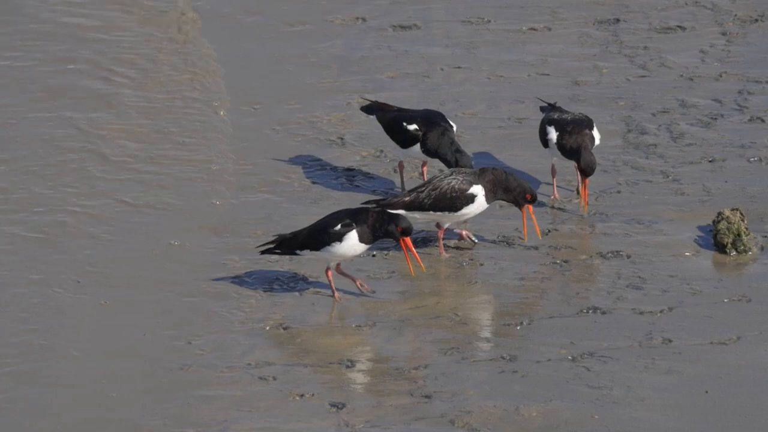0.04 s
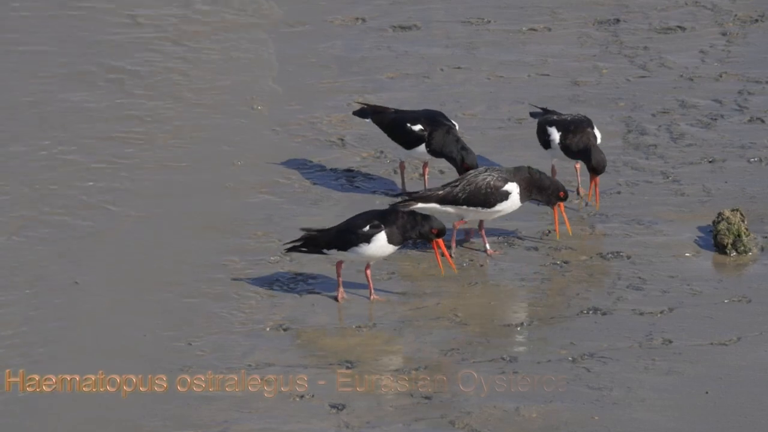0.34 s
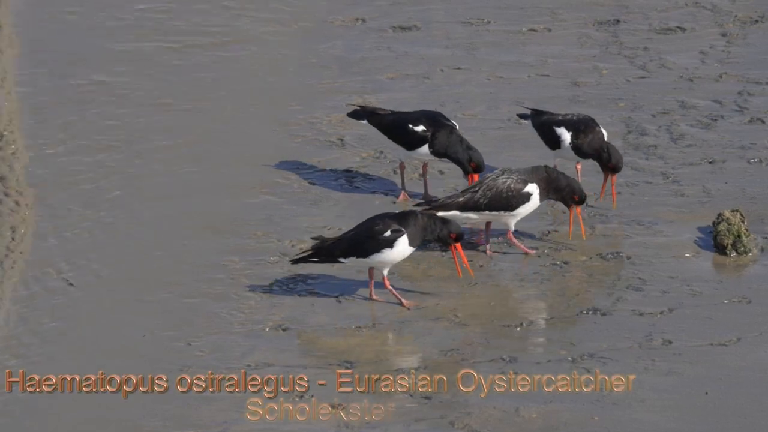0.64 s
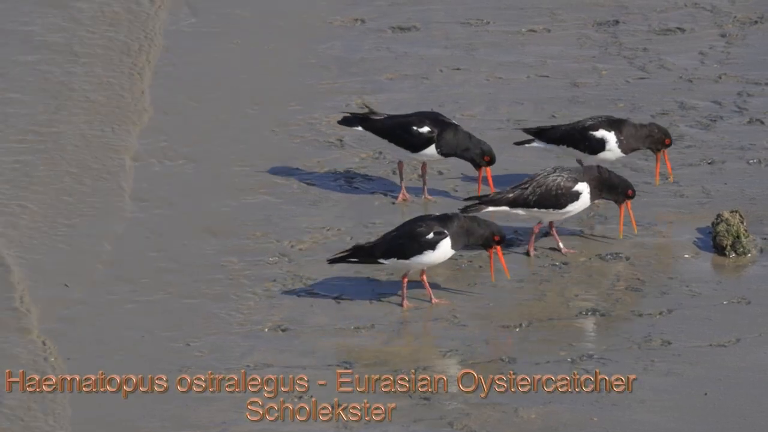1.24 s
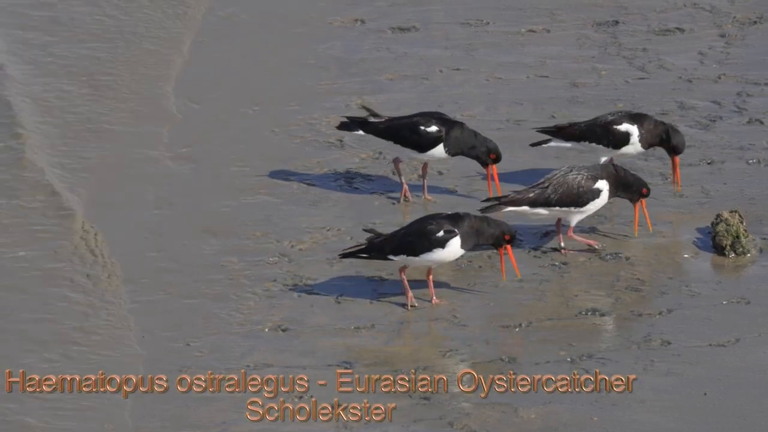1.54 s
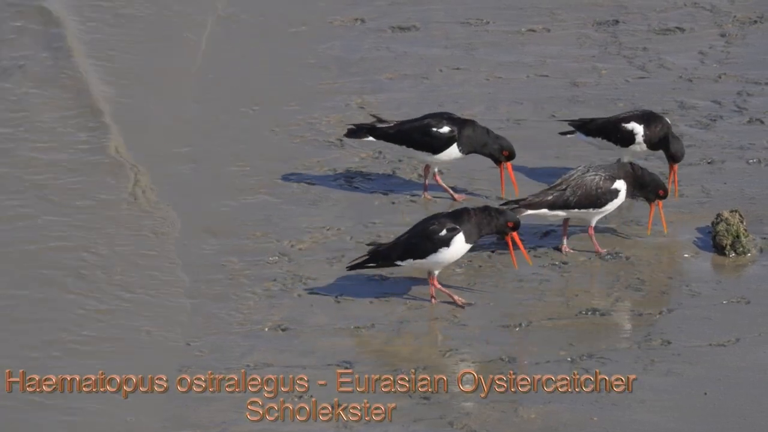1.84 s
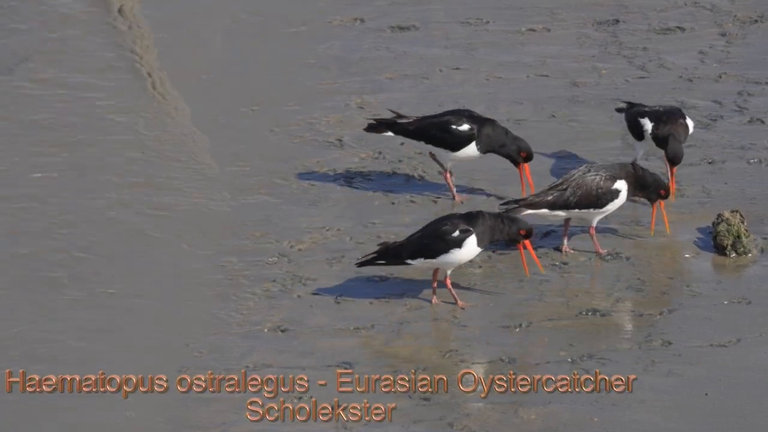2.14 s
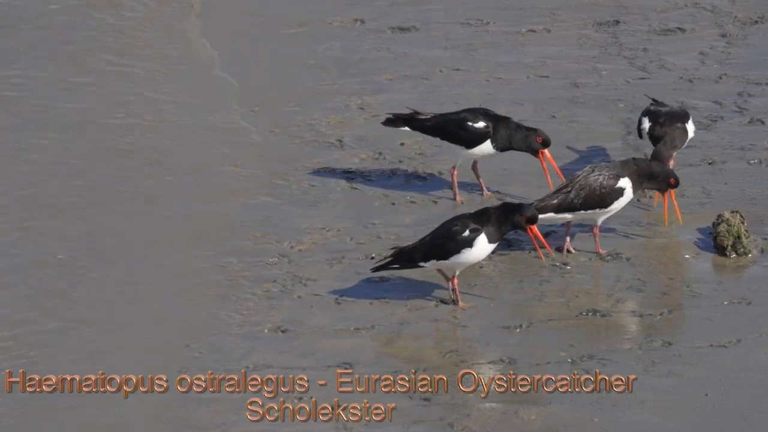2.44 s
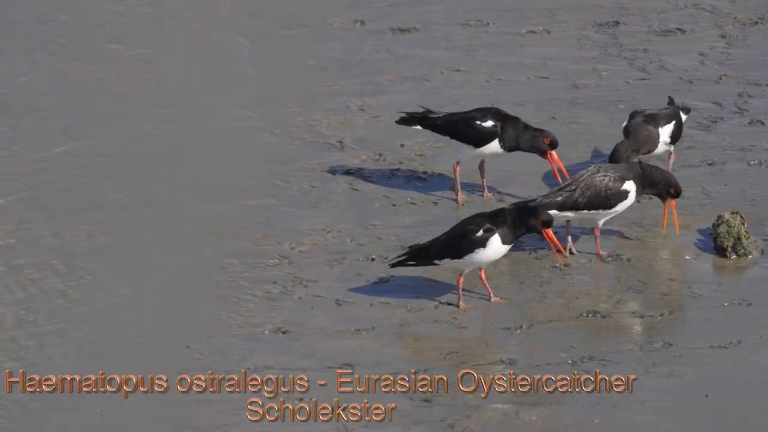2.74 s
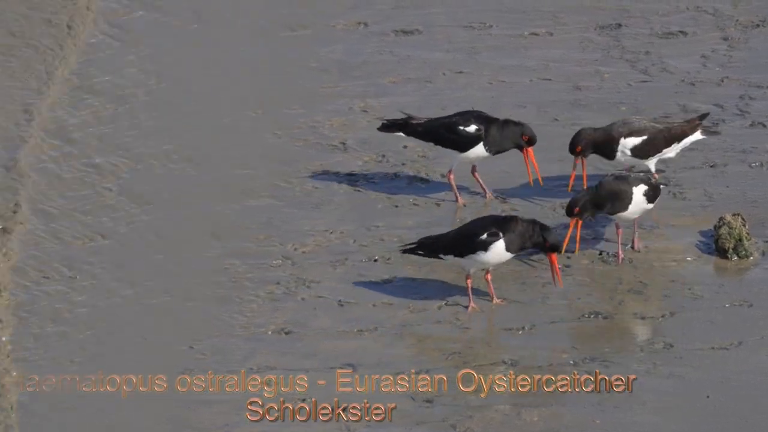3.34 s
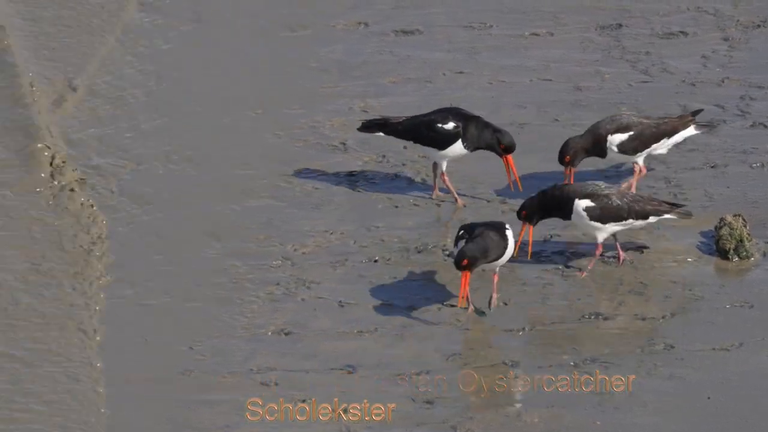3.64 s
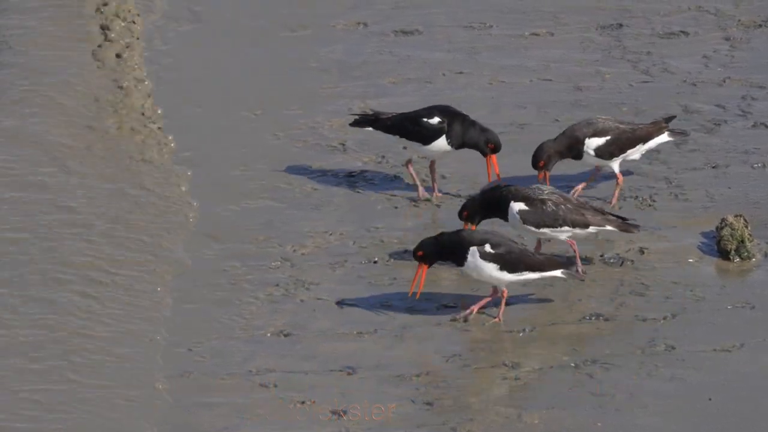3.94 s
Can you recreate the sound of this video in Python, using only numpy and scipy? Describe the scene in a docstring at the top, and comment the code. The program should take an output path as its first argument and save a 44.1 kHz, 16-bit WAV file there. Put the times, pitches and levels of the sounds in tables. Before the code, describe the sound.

Shrill, overlapping piping from several shorebirds, with soft water noise and a brief wooden knock.

```python
"""A mudflat, where four oystercatchers pipe together over a wash of shallow water and a little mic wind.
Shrill kips slide up and break into a high register; lower whistles, arched pips and late, thin squeaks
fall between them, each a few harmonics on a trembling pitch, roughened by air and coloured by the bill.
Hollow wood knocks twice nearby, the banks echo birds and knocks, and one short plip comes near the end."""
import sys
import numpy as np
from scipy import signal
from scipy.fft import rfft, irfft, next_fast_len
from scipy.io import wavfile
from scipy.ndimage import uniform_filter1d, map_coordinates

SR = 44100
rng = np.random.default_rng(int(sys.argv[2]) if len(sys.argv) > 2 else 0)


def unload_audio(sound):
    """Save the sound as a 16-bit wav file, at the path given as the first command line argument."""
    columns = np.transpose(np.atleast_2d(sound))
    # keep every value between -1 and 1, then stretch to whole-number steps
    steps = np.round(np.clip(columns, -1, 1) * 32767)
    wavfile.write(sys.argv[1], SR, steps.astype(np.int16))


N = 176400

# tone of the shallow water (frequency [Hz], level per Hz [dB])
WATER_EQ = [(20, -63), (100, -14.5), (200, -2.5), (800, -9.5), (2500, -6.5), (4000, -12), (14000, -30)]
# fader moves of the wind (time [s], level [dB])
WIND_GUSTS = [(.79, -56), (.86, -48.5), (1.18, -47.5), (1.37, -37), (1.5, -54.5)]
# rumble of wind on the mic (frequency [Hz], level per Hz [dB])
WIND_EQ = [(20, -46), (70, -2), (160, 1), (300, -11.5), (2000, -26)]
# stereo image of the noise layers (frequency [Hz], left-right correlation [ratio])
NOISE_IMAGE = [(50, 0.99), (300, 1), (1000, 0.34), (3000, 0.064), (10000, 0.94)]
# low whistles with a strong octave (centre time [s], top pitch [Hz], fundamental [dB], octave [dB])
LOW_WHISTLES = [(0.346, 2502, -30, -33), (0.595, 2555, -30.5, -36), (0.887, 2576, -31.5, -34.5),
                (0.989, 2570, -30, -35.5), (1.144, 2560, -34.5, -33), (1.25, 2616, -33, -38.5),
                (1.384, 2627, -35, -32.5), (1.643, 2672, -29, -33), (1.908, 2639, -30.5, -33),
                (2.179, 2600, -29, -31.5), (2.459, 2555, -28.5, -32), (2.748, 2475, -30.5, -40)]
# the lead bird's kips
# (centre time [s], length [s], top pitch [Hz], fundamental [dB], octave [dB], left over right [dB])
LEAD_KIPS = [(0.387, 0.047, 3484, -26, -25.5, -9.5), (0.657, 0.042, 3456, -26.5, -27, 2),
             (0.933, 0.047, 3505, -23.5, -26, -4.5), (1.209, 0.043, 3464, -24.5, -28.5, 4),
             (1.473, 0.043, 3423, -24.5, -29.5, 6), (1.746, 0.043, 3432, -33, -31.5, 3),
             (2.019, 0.036, 3430, -29, -32, 11), (2.288, 0.036, 3454, -24, -27.5, -1),
             (2.569, 0.034, 3430, -19.5, -29, -5), (2.845, 0.038, 3405, -27, -33, -6),
             (3.094, 0.029, 3440, -22.5, -34, 3.5), (3.345, 0.033, 3467, -22, -37.5, 3.5),
             (3.603, 0.038, 3428, -26, -35.5, -4), (3.862, 0.036, 3430, -27, -34, -3)]
# the other birds' shorter kips (centre time [s], top pitch [Hz], fundamental [dB], octave [dB])
ANSWER_KIPS = [(0.462, 3125, -19, -30), (0.554, 3300, -27, -29), (0.657, 3090, -26.5, -39),
               (0.723, 3132, -24, -34.5), (0.831, 3247, -29, -32), (1.096, 3150, -31, -30),
               (1.373, 3225, -21, -34.5), (1.641, 3240, -26, -34), (1.861, 3070, -28.5, -39.5),
               (2.256, 3080, -34, -31.5), (2.454, 3156, -48, -31.5), (2.65, 3120, -28.5, -35.5)]
# steeply arched pips (centre time [s], top pitch [Hz], fundamental [dB])
ARCHED_PIPS = [(0.401, 2850, -27), (0.499, 3002, -25.5), (0.784, 2900, -26.5), (0.845, 2800, -28),
               (0.992, 3147, -26), (1.053, 2837, -28), (1.108, 3180, -29.5), (1.156, 2720, -30.5),
               (1.241, 3000, -26.5), (1.483, 3165, -27.5), (1.591, 2948, -31), (1.765, 3050, -27),
               (1.795, 2800, -29.5), (1.915, 3226, -29), (1.968, 2880, -30), (2.019, 3148, -21),
               (2.184, 3126, -25), (2.293, 3134, -24.5), (2.371, 2963, -27.5), (2.47, 3104, -25.5),
               (2.575, 3104, -23.5), (2.749, 3115, -25.5), (2.854, 3060, -21), (3.142, 2950, -23.5),
               (3.39, 2974, -29), (3.772, 3006, -32)]
# thin squeaks, mostly octave (centre time [s], top pitch [Hz], level [dB])
THIN_SQUEAKS = [(2.945, 2330, -46.5), (3, 2823, -31), (3.045, 2240, -36), (3.191, 2740, -44),
                (3.25, 2775, -28.5), (3.297, 2454, -36.5), (3.396, 2476, -38.5), (3.508, 2770, -32),
                (3.562, 2610, -34.5), (3.727, 2580, -36), (3.768, 2775, -33.5), (3.815, 2350, -43),
                (3.874, 2600, -37), (3.961, 2466, -41)]
# air noise in the calls (frequency [Hz], level [dB])
RASP_EQ = [(1200, -43.5), (2400, 7), (3200, 10.5), (3900, -15.5), (5300, 0), (8000, -12), (14000, -19.5)]
# the notch that throat and bill leave above the fundamental (frequency [Hz], gain [dB])
BILL_EQ = [(3520, -0.5), (3750, -40), (4150, -7), (4750, 0.5)]
# reverb time of the banks (frequency [Hz], t60 [s])
BANK_DECAY = [(200, 0.29), (1500, 0.35), (3000, 0.46), (7000, 0.34), (13000, 0.25)]
# tone of the echo return (frequency [Hz], gain [dB])
BANK_EQ = [(200, 1), (1500, -5), (2500, 0), (3300, -2.5), (7000, -4), (11000, -5.5), (14000, -15)]
# a blow and its rebound (time [s], level [dB])
WOOD_HITS = [(2.6464, -24.5), (2.7028, -31.5)]
# modes of the hollow wood (frequency [Hz], level [dB], t60 [s])
WOOD_MODES = [(245, -5, 0.1), (579, -7.5, 0.24), (728, -3.5, 0.17), (788, -3.5, 0.11)]
# contact noise of a knock (frequency [Hz], level per Hz [dB])
CRACK_EQ = [(70, -40), (230, -1), (900, 2.5), (1900, -5.5), (3000, -40)]

LOW_UPPER_DB, ANSWER_UPPER_DB, PIP_UPPER_DB = [-8.5, -8, -20], [-8.5, -22], [-11.5, -5]  # over the octave
SQUEAK_PARTIALS_DB = [-6.5, 1, -13.5, -10, -22]  # partials 1-5 against the squeak's level
LOW_REGISTER_DB = [-8.5, -6.5, -13, 3]  # partials 1-4 against the high register
EDGE_S, HALF_S = 0.0069, .07  # a note's fade; half the span it is built in
NOTE_T = np.arange(-HALF_S, HALF_S, 1 / SR)  # seconds from a note's centre


def amp(db):
    return 10 ** (np.asarray(db) / 20)


def along(points, hz):
    """Read a breakpoint curve on a log frequency axis."""
    f, v = np.transpose(points)
    return np.interp(np.log(hz + 1), np.log(f + 1), v)


def wobble(rate, size=N):
    """A smooth random modulator, rate knots a second."""
    knots = rng.standard_normal(int(size * rate / SR) + 4)
    return map_coordinates(knots, [np.arange(size) * rate / SR])


def filtered(x, response):
    """Zero-phase EQ; response gives the gain at each frequency."""
    size = next_fast_len(N + SR // 2)
    return irfft(rfft(x, size) * response(np.fft.rfftfreq(size, 1 / SR)), size)[..., :N]


def rush(eq):
    """Coloured stereo noise of rms 1, its width set band by band."""
    def mid_side_gains(hz):
        width = np.arccos(np.clip(along(NOISE_IMAGE, hz), -1, 1)) / 2
        return amp(along(eq, hz)) * [np.cos(width), np.sin(width)]
    mid, side = filtered(rng.standard_normal((2, N)), mid_side_gains)
    noise = np.array([mid + side, mid - side])
    return noise / np.sqrt(np.mean(noise ** 2) + 1e-20)


def panned(x, pan_db):
    """Level panning; positive is left."""
    return amp([[pan_db / 2], [-pan_db / 2]]) * x


def add(out, start_s, x):
    """Mix x into out from start_s on."""
    part = out[:, round(start_s * SR):][:, :x.shape[-1]]
    part += x[..., :part.shape[1]]


def step(t, width):
    """A smooth fade from 0 to 1 around t = 0."""
    return .5 + .5 * np.tanh(t / width)


def water(level_db=-42.5):
    """The bed: shallow water washes steadily, its level wavering a little."""
    return amp(level_db + 1.3 * wobble(8.12)) * rush(WATER_EQ)


def wind(pan_db=6):
    """Gusts bump the microphone with a low rumble."""
    gust_db = np.interp(np.arange(N) / SR, *np.transpose(WIND_GUSTS))
    return panned(amp(gust_db + 0.62 * wobble(29.55)) * rush(WIND_EQ), pan_db)


def voice(pitch, gains, pan_db, undertone=0, flutter_db=3, rough_rad=0.065, swell_db_per_s=120):
    """Harmonics on a trembling pitch; the fundamental swells up to mid-note and leans to one side."""
    size = len(pitch)
    jitter = 0.0031 * wobble(482.6, size)
    wander = 0.0044 * wobble(129.2, size)
    phase = 2 * np.pi * np.cumsum(pitch * (1 + jitter + wander)) / SR
    phase += rough_rad * wobble(1500, size)  # grit that smears the high partials most
    partials = []
    for k, gain in enumerate(gains, 1):
        flutter = amp(flutter_db * wobble(218.7, size))
        partials.append(np.sqrt(2) * gain * flutter * np.sin(k * phase) * (k * pitch < SR / 2))
    swell = amp(swell_db_per_s * np.minimum(NOTE_T, 0))
    return panned(partials[0] * swell, pan_db) + sum(partials[1:]) + undertone * np.sin(phase / 2)


def pip(length, hz, levels_db, droop, attack_s=0.0016, undertone_db=-18):
    """One unbroken arch of pitch with a hard attack; droop sets how far its ends sag."""
    pitch = hz / (1 + droop * np.minimum((2 * NOTE_T / length) ** 2, 2))
    envelope = step(NOTE_T + length / 2, attack_s) * step(length / 2 - NOTE_T, EDGE_S)
    # a soft slur an octave below the rise of the arch
    undertone = amp(levels_db[0] + undertone_db) * envelope * step(length / 4 - NOTE_T, EDGE_S)
    return voice(pitch, [amp(db) * envelope for db in levels_db], rng.normal(0, 5.4), undertone)


def kip(length, hz, levels_db, droop, pan_db, low_trim_db=0, lead_s=0.015, trail_s=0.011):
    """The voice slides up in the low register, breaks into a high arch, and drops back."""
    t = NOTE_T
    outside_s = np.abs(t) - length / 2
    high = step(-outside_s, 0.00069)  # the register flips almost at once
    lean = 1 + 0.31 * np.sign(t)  # the arch falls further than it rises
    arch = 1 - droop * np.minimum((2 * t / length) ** 2, 2) * lean
    slide = .83 * np.exp(-12 * np.maximum(outside_s, 0))  # low register as a share of top pitch
    envelope = step(t + length / 2 + lead_s, EDGE_S) * step(length / 2 + trail_s - t, EDGE_S)
    low_gains = amp(np.add(low_trim_db, LOW_REGISTER_DB))
    gains = [amp(db) * envelope * (high + (1 - high) * low) for db, low in zip(levels_db, low_gains)]
    return voice(hz * (high * arch + (1 - high) * slide), gains, pan_db)


def birds(answer_db=-1, pip_db=-2):
    """The dry piping: every call on its cue."""
    out = np.zeros((2, N))
    for s, length, hz, first, octave, pan in LEAD_KIPS:
        levels = [first, octave, -31.5, -49]
        add(out, s - HALF_S, kip(length, hz, levels, droop=0.051, pan_db=pan, low_trim_db=0.5))
    for s, hz, first, octave in ANSWER_KIPS:
        levels = [first, octave, *np.add(octave, ANSWER_UPPER_DB)]
        call = kip(.024, hz, levels, droop=0.03, pan_db=rng.normal(0, 6.2))
        add(out, s - HALF_S, amp(answer_db) * call)
    for s, hz, first, octave in LOW_WHISTLES:
        levels = [first, octave, *np.add(octave, LOW_UPPER_DB)]
        add(out, s - HALF_S, pip(.048, hz, levels, droop=0.07))
    for s, hz, db in THIN_SQUEAKS:
        add(out, s - HALF_S, pip(.037, hz, np.add(db, SQUEAK_PARTIALS_DB), droop=0.15))
    for s, hz, first in ARCHED_PIPS:
        octave = first - 12
        levels = [first, octave, *np.add(octave, PIP_UPPER_DB)]
        add(out, s - HALF_S, amp(pip_db) * pip(.037, hz, levels, droop=0.27))
    return out


def rasp(calls, level_db=-8.5):
    """Air noise that rides the envelope of the calls."""
    envelope = np.sqrt(np.abs(uniform_filter1d(np.mean(calls ** 2, axis=0), size=500)))
    return amp(level_db) * envelope * rush(RASP_EQ)


def bill(calls):
    """Throat and bill carve a notch above the fundamental."""
    return filtered(calls, lambda hz: amp(along(BILL_EQ, hz)))


def banks(x, predelay_s=0.0017, correlation=0.21, count=8):
    """Scattered echoes off the banks; one pattern crossfades to the next as the birds walk about."""
    out, place = np.zeros((2, N)), np.linspace(0, count - 1, N)
    width = np.arccos(correlation) / 2
    for k in range(count):
        hz, t, noise = signal.stft(rng.standard_normal((2, SR // 2)), SR, nperseg=256)
        decay = amp(-60 * t / along(BANK_DECAY, hz)[:, None]) * step(t - predelay_s, 0.0024)
        decay /= np.sqrt(np.sum(decay ** 2, axis=1, keepdims=True) * t[1] * SR)  # equal energy per band
        _, tails = signal.istft(noise * decay * amp(along(BANK_EQ, hz))[:, None], SR, nperseg=256)
        mid, side = tails * [[np.cos(width)], [np.sin(width)]]
        send = np.sqrt(np.maximum(1 - np.abs(place - k), 0)) * x.mean(axis=0)
        out += signal.fftconvolve(send[None], np.array([mid + side, mid - side]), axes=1)[:, :N]
    return out


def knocks(crack_db=2, crack_t60=0.081, pan_db=-8):
    """A blow on hollow wood and its weak rebound: a crack and a few short modes."""
    out, t = np.zeros((2, N)), np.arange(N) / SR
    ring = sum(amp(db - 60 * t / t60) * np.sin(2 * np.pi * hz * t) for hz, db, t60 in WOOD_MODES)
    for s, db in WOOD_HITS:
        crack = amp(crack_db - 60 * t / crack_t60) * rush(CRACK_EQ)
        add(out, s, panned(amp(db) * (ring + crack), pan_db))
    return out


def plip(at_s=3.8513, level_db=-17, width_s=0.0017, hz=850, fall_per_s=410, pan_db=5):
    """A two-cycle blip that dives in pitch."""
    out = np.zeros((2, N))
    phase = 2 * np.pi * hz * (1 - np.exp(-fall_per_s * NOTE_T)) / fall_per_s
    envelope = amp(level_db) * np.exp(-(NOTE_T / width_s) ** 2)
    add(out, at_s - HALF_S, panned(envelope * np.cos(phase), pan_db))
    return out


def scene():
    """Birds and knocks feed the echoes; plip, water and wind stay dry."""
    calls = birds()
    direct = bill(calls + rasp(calls)) + knocks()
    return direct + banks(direct) + plip() + water() + wind()


def record(dry, start_s=.347, top_hz=14400):
    """A hard cut in after a short silence, and a brick-wall low-pass."""
    gate = np.arange(N) / SR > start_s
    return filtered(dry * gate, lambda hz: hz < top_hz)


dry = scene()
out = record(dry)
unload_audio(out)
```